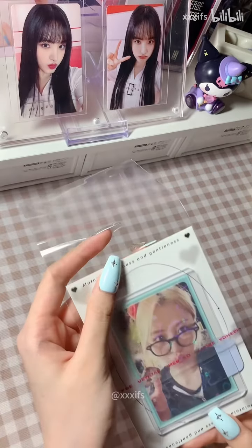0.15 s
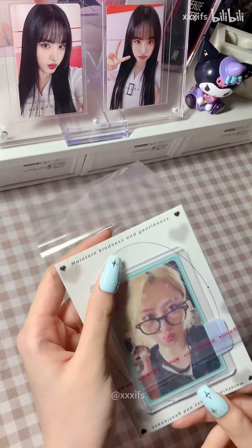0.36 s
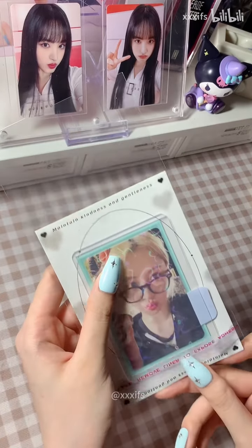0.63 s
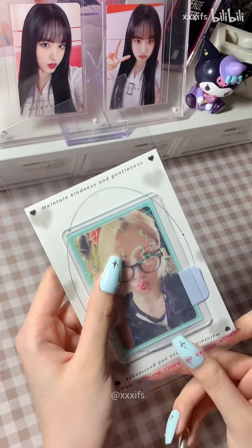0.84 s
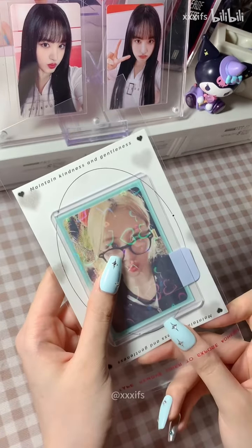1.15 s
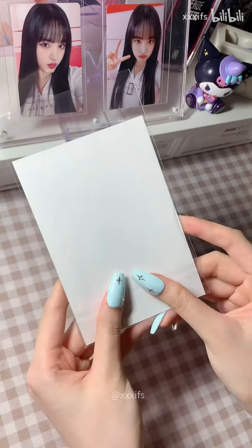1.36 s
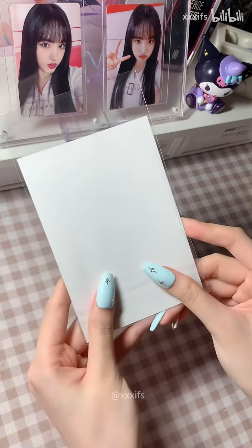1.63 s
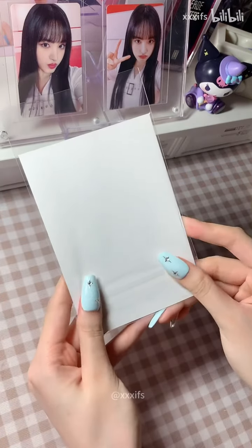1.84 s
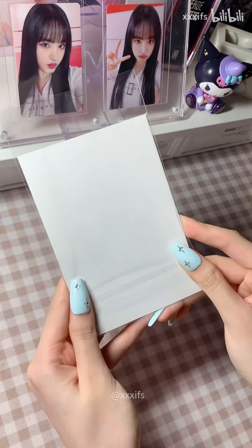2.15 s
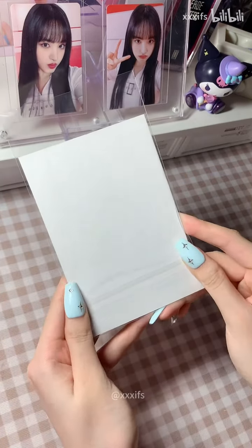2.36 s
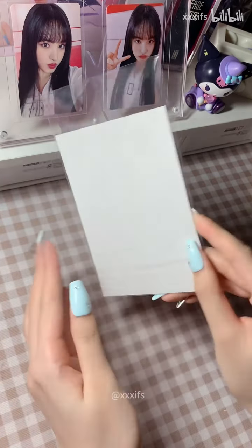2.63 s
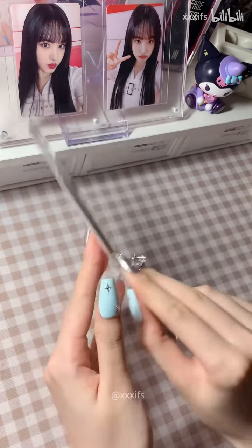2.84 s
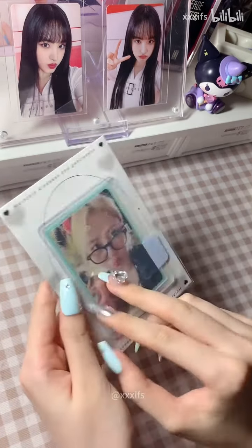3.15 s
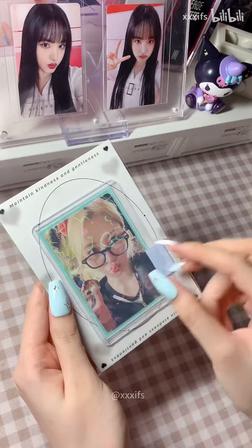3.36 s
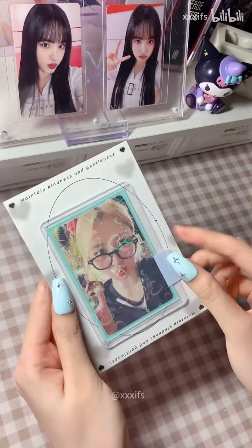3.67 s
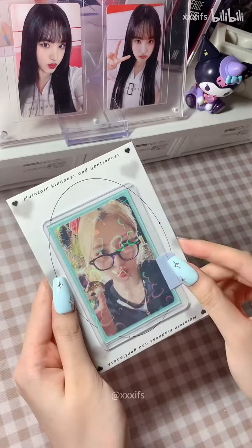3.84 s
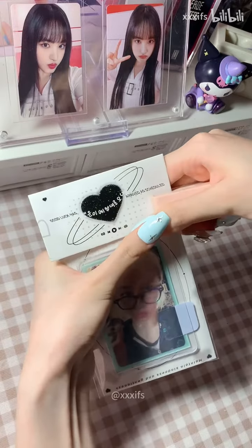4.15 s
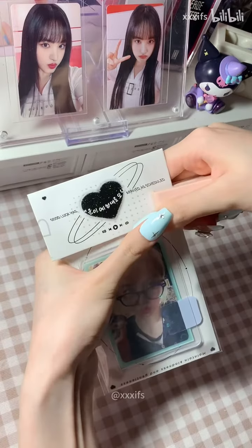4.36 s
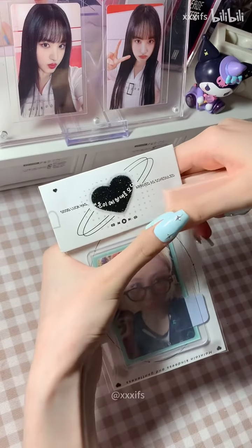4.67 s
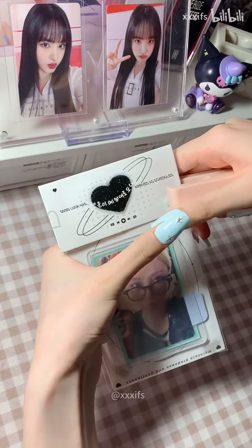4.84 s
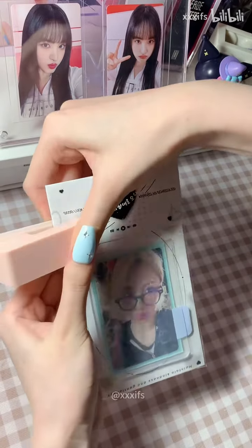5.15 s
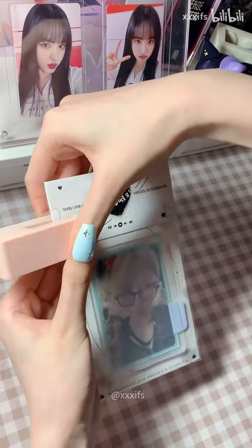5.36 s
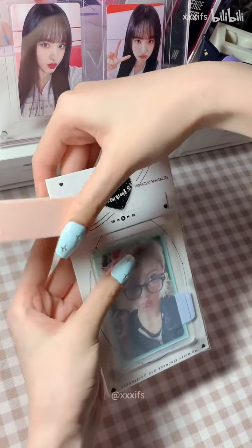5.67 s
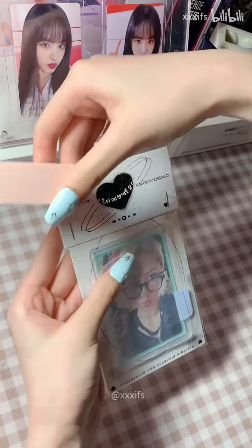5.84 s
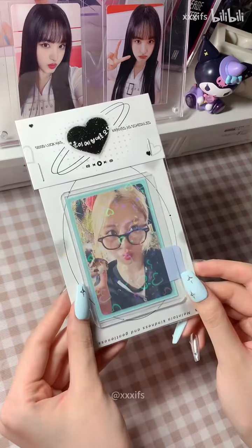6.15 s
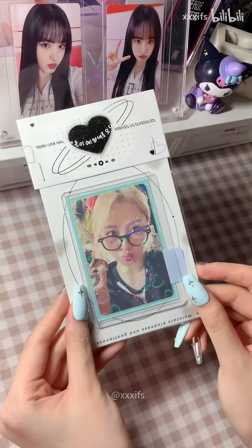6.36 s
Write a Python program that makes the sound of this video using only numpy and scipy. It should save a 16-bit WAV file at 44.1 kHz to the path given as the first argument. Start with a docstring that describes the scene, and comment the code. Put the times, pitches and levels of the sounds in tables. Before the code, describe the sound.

A bright sliding hiss swells and ends in sharp plastic clicks and soft thuds. Thin film then crackles and pops irregularly as fingers turn and tap the packet. Handling quietens before four hard stapler clacks, two presses and two releases, with scraping, a faint hinge creak and springy ringing. Close microphone, dry small room, light air and low desk rumble.

```python
"""A hard plastic card holder on its backing card slides by friction into a cellophane sleeve, close by.
The film hisses, buckles in snaps and crinkles by stick-slip; long nails tap it, padded contacts thud.
A small stapler then drives two staples: struck shell modes crack, the hinge creaks, and the spring's
decaying modes ring most at the releases. A small room answers with noise tails over low rumble and air."""
import sys
import numpy as np
from scipy import signal
from scipy.fft import rfft, irfft, next_fast_len
from scipy.io import wavfile
from scipy.ndimage import map_coordinates

SR = 44100
rng = np.random.default_rng(int(sys.argv[2]) if len(sys.argv) > 2 else 0)


def transcribe(signal):
    """Save signal, clipped to [-1, 1], as a 16-bit WAV file at the path in sys.argv[1]."""
    frames = np.atleast_2d(signal).T
    limited = np.clip(frames, -1, 1)
    pcm = np.round(limited * 32767).astype(np.int16)
    wavfile.write(sys.argv[1], SR, pcm)


N = 286650
TOP_HZ = 12400  # upper edge of the sound
CLICK_S = .006  # length over which a click's rms level is given


def amp(db):
    """Logarithmic level: decibels to amplitude gain."""
    return 10 ** (np.asarray(db) / 20)


def unit(x):
    """Normalisation: scaled to rms 1."""
    return x / np.sqrt(np.mean(x ** 2) + 1e-20)


def along(points, hz):
    """Interpolation of (f/Hz, value) points on a logarithmic frequency axis."""
    f, v = np.transpose(points)
    return np.interp(np.log(hz + 1), np.log(f + 1), v)


def wobble(rate, size=N):
    """Slow random modulation: a smooth curve through rate random knots a second."""
    knots = rng.standard_normal(int(size * rate / SR) + 4)
    return map_coordinates(knots, [np.arange(size) * rate / SR])


def filtered(x, response):
    """Linear filtering: the spectrum of x times a response of frequency."""
    n = x.shape[-1]
    m = next_fast_len(n + 8192)
    return irfft(rfft(x, m) * response(np.fft.rfftfreq(m, 1 / SR)), m)[..., :n]


def resonate(x, peaks):
    """Modal superposition: parallel (f/Hz, width/Hz, level/dB) resonances of alternating sign."""
    def response(f):
        total = 0
        for k, (centre, width, db) in enumerate(peaks):
            mode = 1j * f * width / (centre * centre - f * f + 1j * f * width)
            total = total + (-1) ** k * amp(db) * mode
        return total
    return filtered(x, response)


def noise(spectrum, grain_db=0):
    """Spectral shaping: coloured noise of rms 1, broken into millisecond grains."""
    grains = rng.standard_normal(N) * amp(grain_db * wobble(640))
    return unit(filtered(grains, lambda hz: amp(along(spectrum, hz))))


def add(track, s, sound):
    """Superposition: mix a sound in from time s."""
    part = track[max(round(s * SR), 0):][:len(sound)]
    part += sound[:len(part)]


# low, middle and high bands of a contact: lower f/Hz, upper f/Hz
CONTACT_BANDS = [(250, 1150), (1350, 4750), (5700, 12000)]


def voiced(x, knock_db, bright_db, seconds):
    """Band balance: low and high set against the middle; rms 1 if it lasted that many seconds."""
    def band(lo, hi):
        def response(hz):
            slopes = (1 + (lo / (hz + 1)) ** 10) * (1 + (hz / hi) ** 10)
            return (hz < TOP_HZ) / np.sqrt(slopes)
        return filtered(x, response)
    # equal power per Hz before the balance is applied
    parts = [unit(band(lo, hi)) * np.sqrt(hi - lo) for lo, hi in CONTACT_BANDS]
    balanced = amp([knock_db, 0, bright_db]) @ np.array(parts)
    return unit(balanced) * np.sqrt(seconds * SR / len(balanced))


# level of the low rumble at the desk, before desk_db: t/s, level/dB
RUMBLE_LEVEL = [(0.0, -46.5), (0.61, -44), (4.63, -51), (5.41, -47), (6.06, -46.5), (6.5, -46.5)]
# spectrum of the desk rumble: f/Hz, relative level per Hz/dB
DESK_SPECTRUM = [(15, -31), (30, -18.5), (47, 4.5), (62, -13), (85, -7.5), (115, -9.5), (160, -21.5),
                 (300, -28.5), (700, -43.5), (3000, -77.5)]
# spectrum of the air: f/Hz, relative level per Hz/dB
AIR_SPECTRUM = [(100, -12), (400, -3), (1200, -5), (4000, -15), (12500, -18)]


def background(air_db=-61, desk_db=3):
    """Stationary and slowly modulated noise: air, and a low rumble at the desk."""
    rumble_db = np.interp(np.arange(N) / SR, *np.transpose(RUMBLE_LEVEL))
    rumble = amp(rumble_db + desk_db) * noise(DESK_SPECTRUM)
    return rumble + amp(air_db) * noise(AIR_SPECTRUM)


def crackle(size, rate, spread_db):
    """Poisson-like impulses: sparse tiny slips of rms 1, rate a second, of very unequal strength."""
    happens = rng.random(size) < rate / SR
    strength = np.clip(rng.standard_normal(size), -2, 2)
    sign = rng.choice([-1, 1], size)
    return unit(happens * sign * amp(spread_db * strength))


def slips(size, rate, spread_db=5, width_hz=520):
    """Stick-slip: many film facets slip independently, each ticking at a pitch of its own."""
    pitches = np.geomspace(600, 11000, num=12) * np.exp(.08 * rng.standard_normal(12))
    ticks = 0
    for hz in pitches:
        facet = [(hz, width_hz * np.sqrt(hz / 2000), 0)]
        ticks = ticks + resonate(crackle(size, rate, spread_db), facet)
    return unit(ticks)


# spectrum of card rubbing on film: f/Hz, relative level per Hz/dB
RUBBING_SPECTRUM = [(150, -13), (500, -6), (1150, -9), (2000, -2), (3000, -3), (4500, -5), (7000, -6),
                    (12500, -11)]
# spectrum of the film's sizzle: f/Hz, relative level per Hz/dB
SIZZLE_SPECTRUM = [(1000, -50), (3800, -21), (5500, -8.5), (7600, -5.5), (8700, 0), (10800, -4),
                   (12400, -5.5)]
# filter for the film's crinkles: f/Hz, relative gain/dB
RUSTLE_SPECTRUM = [(150, 20.5), (700, 2.5), (1400, -1), (2600, -3.5), (5000, -7.5), (9500, -2.5),
                   (12500, -10.5)]
# resonances of the card in its sleeve: f/Hz, width/Hz, level/dB
CARD_MODES = [(2000, 220, 0), (3600, 380, 1), (6430, 380, 4), (8650, 400, 1)]
# levels at t = 0; both grow with the length of card inside the sleeve
RUB_START_DB, SIZZLE_START_DB, SLIDE_GROWS_DB_PER_S = -43, -39.5, 6.5
# once the thick holder has passed the sleeve's mouth, the rubbing eases
PASSED_S, EASE_S, EASE_DB = 0.6, 0.2, 16.5
# the card reaches the bottom and the hiss dies away
SEATED_S, STOP_DB_PER_S = .97, 105
# the film is handled freely until the header is fitted, then only held
HELD_S, SETTLE_S, HELD_DB = 3.6, 0.19, -10


def sleeve(grip_db=-59, waver_db=0.4, regrip_db=3):
    """Sliding friction: the card's hiss into the sleeve, with faint crinkles that drop when it is held."""
    t = np.arange(N) / SR
    growth_db = SLIDE_GROWS_DB_PER_S * np.minimum(t, SEATED_S)
    slide_db = growth_db - STOP_DB_PER_S * np.maximum(t - SEATED_S, 0)
    eased_db = EASE_DB * np.clip((t - PASSED_S) / EASE_S, 0, 1)
    held_db = HELD_DB * np.clip((t - HELD_S) / SETTLE_S, 0, 1)

    drag = noise(RUBBING_SPECTRUM, grain_db=1.0)
    rubbing = unit(drag + sum(resonate(drag, [mode]) for mode in CARD_MODES))
    sizzle = noise(SIZZLE_SPECTRUM, grain_db=1.5)
    hiss = amp(RUB_START_DB - eased_db) * rubbing + amp(SIZZLE_START_DB) * sizzle
    hiss = hiss * amp(slide_db + waver_db * wobble(28))

    rustle = slips(N, 70, spread_db=3) + .35 * rng.standard_normal(N)
    crinkles = unit(filtered(rustle, lambda hz: amp(along(RUSTLE_SPECTRUM, hz))))
    return hiss + amp(grip_db + held_db + regrip_db * wobble(12)) * crinkles


# a buckled facet often springs back a moment later, more softly
REBOUND_SHARE, REBOUND_S, REBOUND_DB = .4, 0.0061, -10
# while a crumple lasts, some of its facets buckle with a snap of their own
BUCKLE_DB, BUCKLE_SPREAD_DB, BUCKLE_KNOCK_DB = -3, 2, -2.5
# faint stray ticks while the fingers shift their grip
STRAY_FROM_S, STRAY_TO_S, STRAY_DB, STRAY_BRIGHT_DB = 1.45, 3.6, -47.5, -4


def lesser_snaps(strays=12, buckles_each=2):
    """Elastic recoil and secondary buckling: rebounds, snaps inside crumples and stray ticks, as rows."""
    rows = []
    draws = rng.random((len(SNAP_EVENTS), 2))
    for (s, db, knock_db, bright_db), (chance, delay) in zip(SNAP_EVENTS, draws):
        if chance < REBOUND_SHARE:
            rows.append((s + REBOUND_S * (.5 + delay), db + REBOUND_DB, knock_db, bright_db))
    for s, half, db, bright_db in SCUFF_EVENTS:
        if s < HELD_S:
            for _ in range(buckles_each):
                moment = s + half * rng.uniform(-1, 1)
                level = db + BUCKLE_DB + BUCKLE_SPREAD_DB * rng.standard_normal()
                rows.append((moment, level, BUCKLE_KNOCK_DB, bright_db))
    # one stray tick at random within each equal share of the span
    places = (np.arange(strays) + rng.random(strays)) / strays
    for s in STRAY_FROM_S + (STRAY_TO_S - STRAY_FROM_S) * places:
        rows.append((s, STRAY_DB, 0, STRAY_BRIGHT_DB))
    return rows


# clicks that stand out, film snapping or nails on plastic, before level_db:
# t/s, level/dB, low band (knock)/dB, high band (brightness)/dB
SNAP_EVENTS = [(0.5912, -35, -11, -7), (0.6455, -13.5, -4, 12.5), (0.9353, -25.5, 2, 11),
               (0.967, -17, -1, 8), (0.9958, -23, 0, 22), (1.0043, -19.5, -2, 14), (1.1059, -15.5, 6, 9),
               (1.3222, -23.5, -32, 8.5), (1.3517, -32, -8.5, -3), (1.443, -40.5, -3, 23),
               (1.5, -42, -12, -17), (1.5548, -34, 8, 9), (1.6065, -37, 1, -4.5), (1.6366, -34, 3, -15),
               (1.6479, -38, 0, -2), (1.8093, -39.5, -24, 1.5), (1.85, -41.5, -9, -17),
               (1.9776, -26.5, -35, -1.5), (2.039, -27, -3, 3.5), (2.1301, -37, -1, -13),
               (2.286, -30, -1, 5.5), (2.3159, -22.5, -11, -4), (2.347, -29.5, 6.5, -17),
               (2.3796, -34, 12.5, 0), (2.4988, -33, 0.5, 0), (2.5743, -30, -4, -8.5),
               (2.6861, -31, -10, 17), (2.7792, -27, -20, 4), (2.909, -24, -4.5, -7),
               (2.9304, -28, -12, -14), (2.9863, -24, -35, 6), (3.0906, -23.5, -6, 3.5),
               (3.1357, -23, -7, -1.5), (3.189, -18, 0, 17), (3.5123, -45.5, 0, -2), (3.596, -40, 9.5, 1),
               (3.632, -48.5, 8, -6), (3.7863, -37, 9.5, 1), (3.955, -35, -4.5, -3),
               (3.9702, -34.5, -5.5, 2.5), (4.1182, -35.5, 3, -2), (4.3575, -36, -0.5, -6.5),
               (4.5247, -25.5, -9.5, 5.5), (4.5967, -27.5, -6, 0.5), (5.345, -33, 10, -6),
               (5.5841, -26, 0, 4.5), (5.8455, -40, -14, -12), (5.8855, -37, -25, -8)]


def snaps(longer_per_db=0.08, creep=0.0015, flutter=0.0052, flutter_db=-21, level_db=-0.24, ring_db=4):
    """Snap-through buckling: film strains, cracks and flutters; facets ring at pitches of their own."""
    out = np.zeros(N)
    lead, decay, creep_db = .005, .0012, -12  # s, s, dB
    t = np.arange(SR // 24) / SR - lead
    for s, db, knock_db, bright_db in list(SNAP_EVENTS) + lesser_snaps():
        life = decay * np.exp(longer_per_db * bright_db)  # brighter cracks last longer
        strain = amp(creep_db) * np.exp(-abs(t) / creep)
        release = np.exp(-abs(t) / life) + amp(flutter_db) * np.exp(-abs(t) / flutter)
        crack = np.where(t < 0, strain, release) * rng.standard_normal(len(t))
        pitches = np.geomspace(900, 10000, num=7) * np.exp(.15 * rng.standard_normal(7))
        ring = resonate(crack, [(hz, 520, ring_db) for hz in pitches])
        click = voiced(crack + ring, knock_db, bright_db, CLICK_S)
        add(out, s - lead - .0006, amp(db + level_db) * click)
    return out


# reverberation time of the small room: f/Hz, t60/s
ROOM_DECAY = [(150, 0.34), (600, 0.3), (2500, 0.24), (6000, 0.27), (12000, 0.2)]


def room(x, gap=0.0091, build=0.0018):
    """Reverberation: after a gap, noise decays by t60; a fresh random tail for each quarter second."""
    out = np.zeros(N)
    for start in range(0, N, SR // 4):
        hz, t, z = signal.stft(rng.standard_normal(SR // 2), SR, nperseg=256)
        decay = amp(-60 * t / along(ROOM_DECAY, hz)[:, None])
        tail = signal.istft(z * decay, SR, nperseg=256)[1]
        since_gap = np.maximum(np.arange(len(tail)) / SR - gap, 0)
        tail = tail * (1 - np.exp(-since_gap / build))
        answer = signal.fftconvolve(x[start:start + SR // 4], tail / np.linalg.norm(tail))
        add(out, start / SR, answer)
    return out


# short scuffs and crumples, before level_db: middle t/s, half length/s, level/dB, high band/dB
SCUFF_EVENTS = [(0.649, 0.01, -26, 8), (0.703, 0.016, -40, -9), (0.933, 0.026, -26.5, 16.5),
                (0.989, 0.012, -30.5, 8), (1.108, 0.012, -26, 2.5), (2.023, 0.017, -39.5, -1.5),
                (2.325, 0.021, -31, 6.5), (2.425, 0.035, -40, -8), (2.512, 0.017, -37.5, 1),
                (2.838, 0.016, -29.5, -7.5), (2.918, 0.018, -32.5, -3), (2.967, 0.012, -36, 2.5),
                (3.126, 0.017, -27.5, -3), (3.188, 0.0067, -27.5, 0.5), (3.244, 0.036, -41, 7),
                (3.439, 0.022, -44.5, 1.5), (4.569, 0.014, -40.5, -13), (4.853, 0.012, -44.5, -22),
                (5.166, 0.011, -47, -15), (5.315, 0.018, -40, -7.5), (5.343, 0.0082, -32.5, -11),
                (5.596, 0.018, -34, -1), (5.93, 0.065, -52.5, -11.5)]


def scuffs(rate=200, catch_db=4.5, level_db=-1.5, knock_db=0.9):
    """Stick-slip friction: film and card drag in short swells, catching and slipping many times."""
    out = np.zeros(N)
    t = np.arange(SR // 4) / SR
    middle = t.mean()
    for s, half, db, bright_db in SCUFF_EVENTS:
        swell = np.exp(-(abs(t - middle) / (1.15 * half)) ** 2)
        swell = swell * amp(catch_db * wobble(248.9, size=len(t)))
        friction = slips(len(t), rate) + .4 * rng.standard_normal(len(t))
        scuff = voiced(swell * friction, knock_db, bright_db, 2 * half)
        add(out, s - middle, amp(db + level_db) * scuff)
    return out


# firmer bumps of the packet against hand and desk: t/s, nominal level/dB
BUMP_EVENTS = [(0.707, -41.5), (.985, -38.5), (1.108, -43.5), (4.024, -41), (5.34, -35)]
# spectrum of a padded contact: f/Hz, relative level per Hz/dB
THUD_SPECTRUM = [(40, -17), (110, 9), (330, 8.5), (650, -7), (1200, -10), (3000, -32.5)]
# every scuff and stapler blow also pushes the packet against hand or desk; dull scuffs push harder
PUSH_DB, PUSH_PER_BRIGHT_DB, PUSH_LEAD_S, STAPLER_PUSH_DB = -9.5, -0.53, 0.0048, -37


def bumps(rise=.003, decay=0.018):
    """Overdamped impact: padded contacts give a dull push of noise with no ring."""
    contacts = [(s - PUSH_LEAD_S, db + PUSH_DB + PUSH_PER_BRIGHT_DB * bright_db)
                for s, _, db, bright_db in SCUFF_EVENTS]
    contacts += [(blow[0], STAPLER_PUSH_DB) for blow in STAPLER_BLOWS]
    contacts += list(BUMP_EVENTS)
    push = np.zeros(N)
    t = np.arange(SR // 6) / SR
    shape = (1 - np.exp(-t / rise)) * np.exp(-t / decay)
    for s, db in contacts:
        add(push, s - rise, amp(db) * shape)
    return push * noise(THUD_SPECTRUM)


# stapler blows, press and release twice: t/s, level/dB, low band/dB, high band/dB, arm f/Hz, decay/s,
# scrape level/dB, scrape rise/s, level sent to the room re blow/dB, spring level/dB
STAPLER_BLOWS = [(4.1400, -11.5, -0.5, 0, 2400, 0.0012, -26.5, 0.0037, -2.5, -50),
                 (4.709, -11, -19, -3, 1970, 0.0021, -25, 0.0024, -13.5, -30.5),
                 (5.03, -8.5, -17, -7, 2397, 0.0038, -16.5, 0.0052, -10, -49),
                 (5.6448, -9.5, -15, -7, 2540, 0.0097, -6.5, 0.0058, -17, -32)]
# modes of the stapler's spring and steel rail: f/Hz, relative level/dB, t60/s
SPRING_MODES = [(1044, -21, 1.2), (2519, -2, .3), (2683, -4, .48), (2842, 2, .37), (3060, -14, .3),
                (3160, -11, .28), (4910, -15, .62), (5292, -14, .55), (5394, -19, .7), (5744, -16, .4),
                (6751, -17, .45), (7590, -15, .2), (8110, -16, .2), (8730, -16, .22)]
# resonances of the stapler's plastic shell: f/Hz, width/Hz, level/dB
SHELL_MODES = [(770, 1100, -12), (1423, 80, -1.5), (4100, 180, -23), (4780, 120, -3), (6290, 3000, -20.5),
               (9280, 1200, -10), (9770, 230, -7.5), (11070, 420, -8)]


def stapler(waver=.75):
    """Struck modes: the blade scrapes, the shell cracks, the spring rings; returns direct and room send."""
    direct, sent = np.zeros(N), np.zeros(N)
    lead, bare = .025, .1  # s before the blow; share of unresonated crack
    t = np.arange(SR * 3 // 4) / SR - lead
    after = np.maximum(t, 0)
    impulse = signal.unit_impulse(len(t), round(lead * SR))
    for (s, db, knock_db, bright_db, arm_hz, decay,
         scrape_db, rise, room_db, spring_db) in STAPLER_BLOWS:
        body = list(SHELL_MODES) + [(arm_hz, 450, 1)]  # the arm's pitch depends on how it is gripped
        scrape = amp(scrape_db - db) * np.exp(-abs(t) / rise)
        force = np.where(t < 0, scrape, np.exp(-after / decay))
        crack = force * rng.standard_normal(len(t))
        blow = amp(db) * voiced(resonate(crack, body) + bare * crack, knock_db, bright_db, CLICK_S)
        ring = 0
        for hz, level, t60 in SPRING_MODES:
            envelope = amp(level + rng.standard_normal() - 60 * after / t60)
            # the loosely seated spring wavers in phase as it rings
            phase = 2 * np.pi * hz * after + waver * wobble(50, size=len(t))
            ring = ring + envelope * np.sin(phase)
        add(direct, s - lead, blow + amp(spring_db) * ring * (t > 0))
        knock = voiced(resonate(impulse, body) + bare * impulse, -6.5, -1.5, CLICK_S)
        add(sent, s - lead, amp(db + room_db) * knock)
    return direct, sent


# creaks as the stapler is squeezed and let go: middle t/s, Gaussian half length/s, level/dB
CREAK_EVENTS = [(4.635, 0.011, -41), (4.686, .012, -42), (5.329, 0.021, -40), (5.451, 0.014, -57),
                (5.605, 0.013, -37.5), (5.98, 0.032, -61)]
HINGE_HZ = 2540


def creaks(rate=900, width_hz=300):
    """Stick-slip excitation: steel slips in the hinge feed one narrow resonance."""
    out = np.zeros(N)
    t = np.arange(SR // 4) / SR
    middle = t.mean()
    for s, half, db in CREAK_EVENTS:
        friction = crackle(len(t), rate, 3.8) + .5 * rng.standard_normal(len(t))
        squeak = resonate(friction, [(HINGE_HZ, width_hz, 0)])
        squeak = resonate(squeak, [(HINGE_HZ, 3 * width_hz, 0)])
        swell = np.exp(-((t - middle) / half) ** 2 / 2)
        add(out, s - middle, amp(db) * unit(squeak) * swell)
    return out


def scene(packet_room_db=-13):
    """Superposition: packet and stapler in the middle, their room answers, and the background."""
    packet = snaps() + scuffs() + bumps() + creaks()
    staples, sent = stapler()
    answers = room(amp(packet_room_db) * packet, gap=0.0016) + room(sent)
    mid = packet + sleeve() + staples + answers + background()
    return np.array([mid, mid])


def treble_difference(mid):
    """Phase quadrature: a treble side signal, rippled along frequency, that sets the channels apart."""
    side_db, corner_hz, scatter_s = -12, 3900, .0004

    def response(hz):
        ripple = np.cos(2 * np.pi * hz * scatter_s)
        return 1j * amp(side_db) * ripple / (1 + (corner_hz / (hz + 1)) ** 20)
    return filtered(mid, response)


# moments when the level dips briefly: middle t/s, half length/s
LEVEL_DIPS = [(1.43, 0.0081), (4.057, 0.0058), (4.996, 0.02), (6.133, 0.0073)]


def record(dry):
    """Saturation and band limiting: brief level dips, rounded peaks, widened treble and a cut top."""
    t = np.arange(N) / SR
    dip = sum(np.exp(-((t - s) / half) ** 4) for s, half in LEVEL_DIPS)
    dipped = dry * (1 - .93 * dip)
    rounded = dipped / (1 + abs(dipped / .74) ** 6) ** (1 / 6)
    wide = rounded + treble_difference(rounded) * [[1], [-1]]
    return filtered(wide, lambda hz: 1 / np.sqrt(1 + (hz / TOP_HZ) ** 300))


dry = scene()
out = record(dry)
transcribe(out)
```